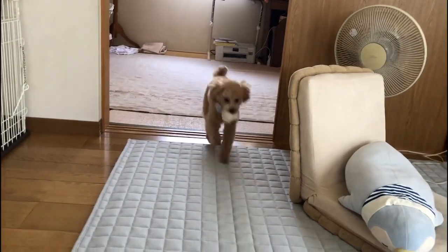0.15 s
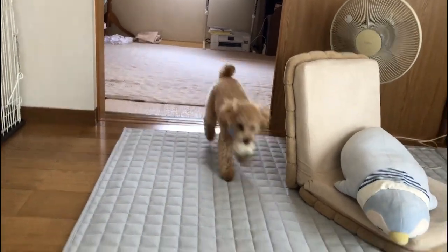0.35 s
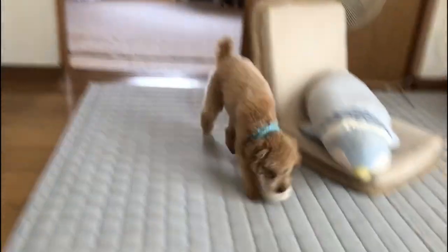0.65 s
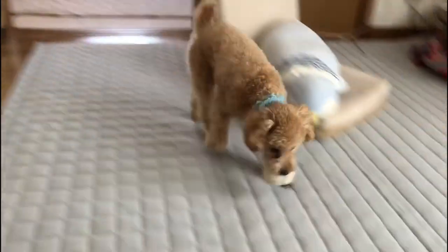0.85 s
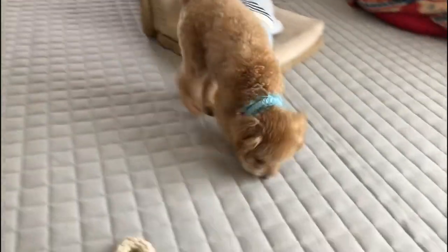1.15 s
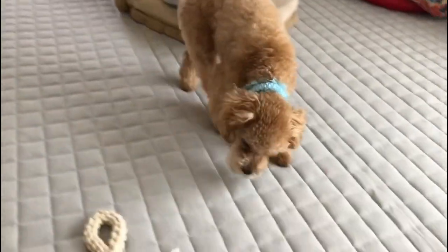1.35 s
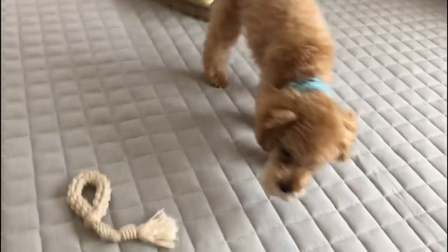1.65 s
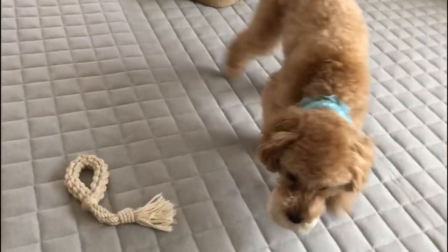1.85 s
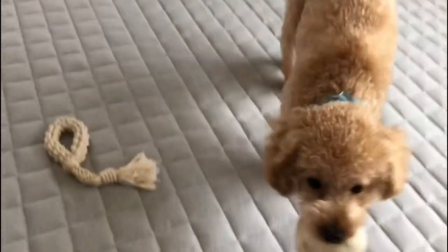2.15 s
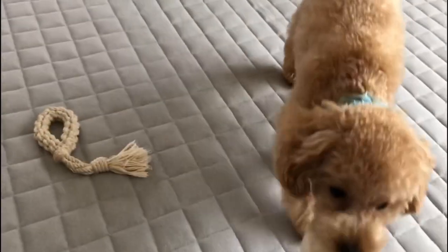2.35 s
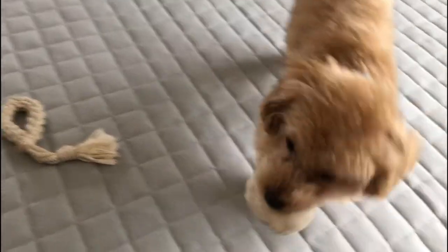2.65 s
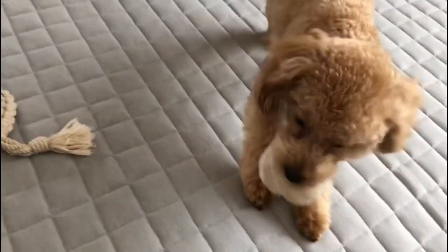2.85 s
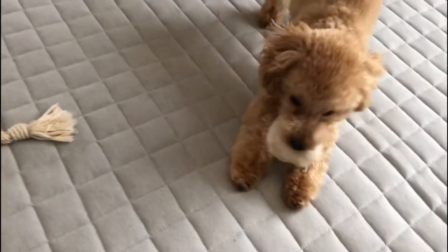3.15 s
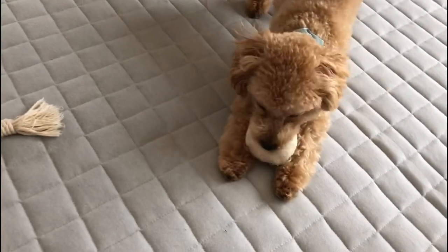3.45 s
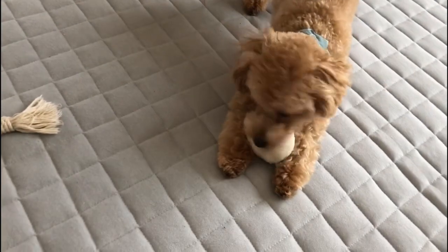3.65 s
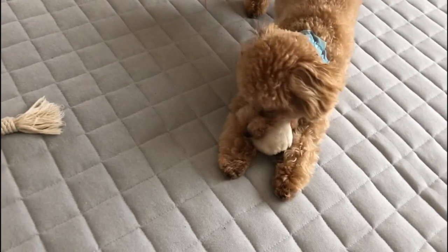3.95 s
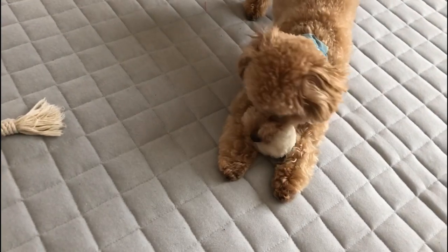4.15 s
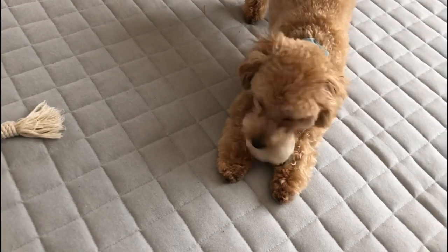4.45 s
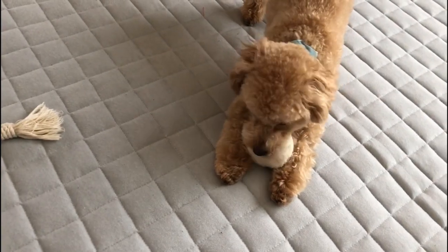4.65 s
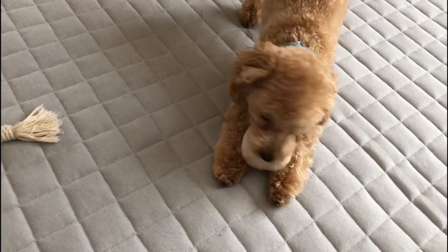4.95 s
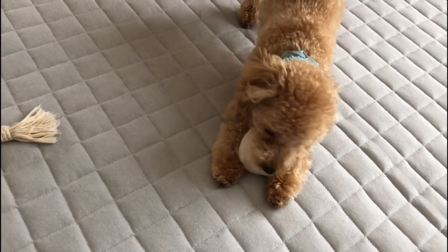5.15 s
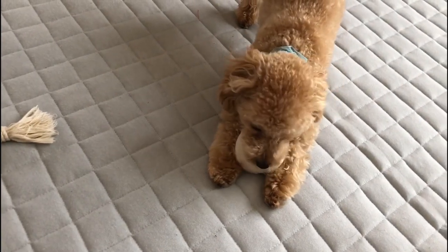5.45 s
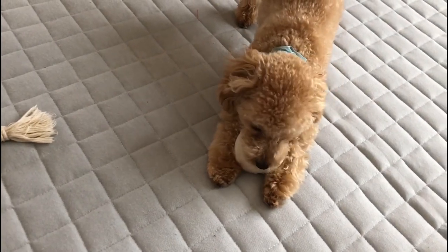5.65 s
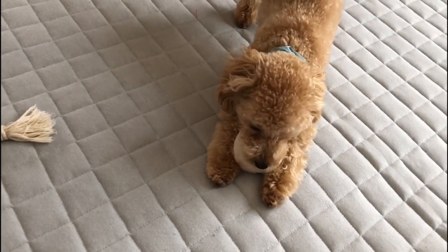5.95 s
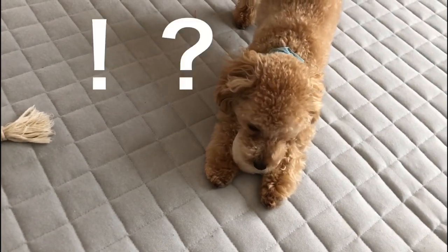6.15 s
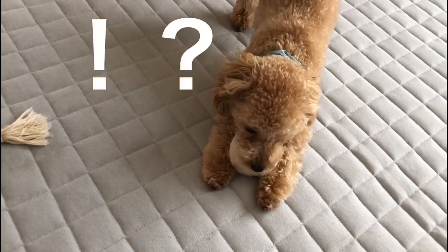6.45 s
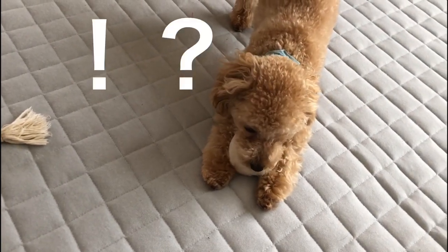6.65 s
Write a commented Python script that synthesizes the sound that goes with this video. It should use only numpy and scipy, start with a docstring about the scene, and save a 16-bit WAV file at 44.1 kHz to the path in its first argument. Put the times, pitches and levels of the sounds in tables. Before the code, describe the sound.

In a small living room, a dog trots in with faint claw ticks and soft, low footfalls. Its plush toy gives one quiet squeak, and paws scuff a mat as it settles near the microphone. It then bites out four short, bright squeaks, each louder than the one before, the last doubled and joined by a dull pop. A fan hums faintly underneath.

```python
"""A small living room: a small dog trots over a quilted mat with a plush toy and lies down close by.
It bites the toy five times. Each bite drives air through the squeaker's reed: a short, bright note whose
pitch arches with the pressure; under the hardest bite the bladder pops. Claws tick on the wooden
threshold, the floor booms softly, the mat is scuffed, and a fan hums faintly over a low room tone."""
import sys
import numpy as np
from scipy import signal
from scipy.fft import rfft, irfft, next_fast_len
from scipy.io import wavfile
from scipy.ndimage import map_coordinates

SR = 44100
rng = np.random.default_rng(int(sys.argv[2]) if len(sys.argv) > 2 else 0)


def put_to_file(sound):
    """Save the sound as 16-bit audio at rate SR, in the file named by the first command-line argument."""
    columns = np.atleast_2d(sound).T  # one column per channel
    safe = np.clip(columns, -1, 1)
    whole_steps = np.round(safe * 32767)
    wavfile.write(sys.argv[1], SR, whole_steps.astype(np.int16))


N = 299457
TIME_S = np.arange(N) / SR
EVENT_S = np.arange(SR // 2) / SR  # time axis of one short event
LEAD_S = 0.006  # the reed stirs before it speaks


def squeaks(start_sag=0.09, end_sag=0.19, room_at_1m_db=-9):
    """Pitch arches with bite pressure; jaw and plush muffle each note differently."""
    # Each row: start in s, length in s, time to crest in s, crest pitch in Hz, hold (1 = even fall,
    # more = late fall), gain in dB, release in s, then low overtones, middle overtones and treble in dB.
    squeezes = [ (0.908, .021, 0.0051, 1365, 3.6, -34, 0.0095, 5.5, -1.5, 1),
                (3.558, 0.031, 0.0064, 1367, 4.3, -26.5, 0.021, -4, -5, -4),
                (4.3299, 0.037, 0.015, 1452, 2.88, -23.5, 0.016, -0.5, -1.5, -4),
                (4.923, .040, 0.018, 1527, 1.06, -22, 0.02, -1.5, -2, -1.4),
                (5.503, 0.01, .0015, 1532, .53, -18, .013, 0.5, 3.5, 10),
                (5.5334, 0.036, 0.014, 1476, 6.4, -22, 0.0088, -5.5, -9.5, 0)]
    # Fundamental, low overtones, middle overtones and treble, in Hz.
    bands_hz = [1400, 2800, 5500, 7500]
    # The dog nears, so the room's share falls. Each row: time in s, distance in m.
    approach = [(0.9, 1.3), (3, 0.63)]
    out = np.zeros(N)
    for start_s, length_s, crest_s, hz, hold, db, release_s, *overtones_db in squeezes:
        muffling = list(zip(bands_hz, [0] + overtones_db))
        pitches_hz = hz * (1 - start_sag), hz, hz * (1 - end_sag)
        note = reed(length_s, crest_s, pitches_hz, hold, release_s, muffling)
        distance_m = np.interp(start_s, *np.transpose(approach))
        room_db = room_at_1m_db + 20 * np.log10(distance_m)
        add(out, start_s - LEAD_S, in_room(amp(db) * note, room_db))
    return out


def reed(length_s, crest_s, pitches_hz, hold, release_s, muffling,
         attack_s=0.00048, jitter=0.0045, flutter=0.013, air_db=-26, leak_db=14, lag_rad=0.45):
    """One note: the reed slaps shut once a cycle and sharpens as the pressure peaks."""
    # Squeaker heard through plush. Each row: frequency in Hz, gain in dB.
    squeaker = [(1400, -1), (2800, -4.5), (4200, -3.5), (5700, -4), (7100, -14), (8500, -11), (10400, -4.5),
                (11800, -9), (13300, -18), (15500, -25)]
    t = np.arange(int((length_s + LEAD_S) * SR)) / SR - LEAD_S
    start_hz, crest_hz, end_hz = pitches_hz
    to_crest = np.clip(1 - t / crest_s, 0, 1)
    spent = np.clip((t - crest_s) / (length_s - crest_s), 0, 1)
    hz = crest_hz + (start_hz - crest_hz) * to_crest ** 2 + (end_hz - crest_hz) * spent ** hold
    failing = spent ** 4  # unsteady and airy as the pressure runs out
    hz *= 1 + (jitter + flutter * failing) * wobble(900, len(t))
    phase = 2 * np.pi * np.cumsum(hz) / SR
    # The swing grows until it saturates; overtones come once the reed slaps.
    growth = 1 / (1 + np.exp(1 - t / attack_s))
    swing = np.sqrt(growth) * np.sin(np.pi / 2 * np.clip((length_s - t) / release_s, 0, 1))
    k = np.arange(1, 14)[:, None]
    gains = amp(along(squeaker, k * hz) + along(muffling, k * hz)) * growth ** (k > 1)
    barrel_lag = lag_rad * k ** 2 / 2  # higher partials come late, smearing each slap
    tone = unit(np.sum(gains * np.cos(k * phase - barrel_lag), axis=0))
    air = noise([(300, -42.5), (900, -10.5)] + squeaker, len(t)) * (1 + 0.48 * np.cos(phase))
    return swing * (tone + amp(air_db + leak_db * failing) * air)


def pops(puff_db=-13, puff_t60_s=0.044, band_hz=(150, 1700)):
    """The bladder buckles and flaps back: each time a damped ring of its wall and a dull puff."""
    # Each row: start in s, gain in dB.
    flaps = [(5.5039, -13), (5.5657, -32.5)]
    # Each row: frequency in Hz, gain in dB, t60 in s.
    wall_modes = [(465, -26, .018), (740, -6.5, 0.0117), (927, -5, 0.012)]
    # Each row: frequency in Hz, level in dB.
    puff_spectrum = [(60, -27), (150, -4.5), (350, -11.5), (600, -12), (950, -3), (1300, 4), (2200, -2),
                     (8000, -36)]
    out = np.zeros(N)
    wall = sum(amp(db) * np.sin(2 * np.pi * hz * EVENT_S) * decay(EVENT_S, t60_s)
               for hz, db, t60_s in wall_modes)
    # The microphone's low cut thins the bass; the treble is dulled.
    pop_band = signal.butter(4, band_hz, "band", fs=SR, output="sos")
    for start_s, db in flaps:
        puff = amp(puff_db) * noise(puff_spectrum, len(EVENT_S)) * decay(EVENT_S, puff_t60_s)
        add(out, start_s, in_room(amp(db) * signal.sosfilt(pop_band, wall + puff), room_db=-10.5))
    return out


def ticks():
    """Claws strike wood, later teeth strike the toy: short noise bursts."""
    # Each row: start in s, level in dB, centre in Hz, t60 in s.
    contacts = [(0.0863, -58, 2510, 0.038), (0.099, -50.5, 1600, 0.023), (.1440, -48.5, 4000, 0.0094),
                (0.219, -48, 3150, 0.019), (0.231, -60, 8000, 0.011), (1.5313, -59.5, 3950, 0.016),
                (4.612, -55.5, 1170, 0.016), (4.873, -61, 5940, 0.02), (5.488, -61.5, 11000, .07)]
    out = np.zeros(N)
    for start_s, db, hz, t60_s in contacts:
        tick = noise([(hz / 4, -18), (hz, 0), (hz * 5, -28)], len(EVENT_S)) * decay(EVENT_S, t60_s)
        add(out, start_s, in_room(amp(db) * tick, room_db=-4))
    return out


def trot(first_s=0.1043, step_s=0.11, steps=5, first_db=-51, fade_db=2.3, floor_hz=81.3):
    """Evenly paced footfalls set the wooden floor booming, each softer than the last."""
    out = np.zeros(N)
    envelope = np.minimum(EVENT_S / 0.011, 1) * decay(EVENT_S, t60_s=0.55)
    for step in range(steps):
        hz = floor_hz * (1 + 0.035 * rng.standard_normal())
        boom = np.sin(2 * np.pi * hz * EVENT_S) * envelope
        add(out, first_s + step * step_s, amp(first_db - step * fade_db) * boom)
    return out


def scuff(grain_db=0.91):
    """Paws and body rub the mat: grainy cloth noise."""
    # Each row: start in s, level in dB, rise in s, t60 in s.
    strokes = [(2.41, -59.5, 0.067, 0.26), (2.489, -51, 0.0015, 0.37)]
    # Each row: frequency in Hz, level in dB.
    cloth_spectrum = [(300, -29), (650, -13), (850, 7.5), (1300, 5), (2200, -6.5), (3600, -14), (5800, -22),
                      (7500, -36), (16000, -43)]
    out = np.zeros(N)
    for start_s, db, rise_s, t60_s in strokes:
        fibres = amp(grain_db * wobble(280, len(EVENT_S))) * noise(cloth_spectrum, len(EVENT_S))
        envelope = np.minimum(EVENT_S / rise_s, 1) * decay(np.maximum(EVENT_S - rise_s, 0), t60_s)
        add(out, start_s, amp(db) * unit(fibres) * envelope)
    return out


def thuds(rise_s=0.0058, t60_s=0.47):
    """The body settles in soft, dull bumps."""
    # Each row: start in s, level in dB, centre in Hz.
    bumps = [(1.41, -63.5, 560), (3.032, -57.5, 280), (4.008, -62, 330), (4.243, -65, 277)]
    out = np.zeros(N)
    envelope = np.minimum(EVENT_S / rise_s, 1) * decay(EVENT_S, t60_s)
    for start_s, db, hz in bumps:
        thud = noise([(hz / 4, -40), (hz, 0), (hz * 2, -22), (hz * 10, -80)], len(EVENT_S))
        add(out, start_s, amp(db) * thud * envelope)
    return out


def slides():
    """Fur hisses over the quilt as the front paws stretch out."""
    # Each row: midpoint in s, level in dB, half length in s.
    strokes = [(2.72, -75, .022), (2.932, -69.5, .04)]
    # Each row: frequency in Hz, level in dB.
    quilt_spectrum = [(1000, -17), (3500, -13), (6000, 2), (11000, -3), (16000, -6)]
    envelope = sum(amp(db) * np.exp(-((TIME_S - mid_s) / half_s) ** 2) for mid_s, db, half_s in strokes)
    return envelope * noise(quilt_spectrum, N)


def fan(motor_hz=55.2, drift=0.002, waver_db=3, air_db=2, tones_db=0.5, ducked_db=-82.5, fade_s=0.064):
    """Steady whir of air and motor tones, ducked by noise suppression between three set stretches."""
    # Each row: start in s, end in s, start gain in dB, end gain in dB, share of low hum.
    heard_stretches = [(-0.1, 3.07, -72, -68, 0), (4.01, 4.27, -71.5, -67, 0.41),
                       (5.21, 6.9, -67.5, -69, 1)]
    # Each row: frequency in Hz, level in dB.
    air_spectrum = [(150, -31.5), (250, -4), (329, 2), (392, -12), (632, -7.5), (883, -6), (963, -6),
                    (1040, -3), (1150, -6.5), (1360, -11.5), (2020, -16), (3210, -20), (8000, -46),
                    (10400, -58), (17600, -120)]
    # Sounding multiples of the motor rate.
    orders = [5, 6, 9, 13, 15, 16, 18, 19, 20, 21, 22, 39]
    # Gain per order in dB, as a whine.
    whine_gains_db = [-7, -9, -28, -9, -22, -11.5, -11, -9, -5.5, -9, -12.5, -14]
    # Gain per order in dB, as a low hum.
    hum_gains_db = [-7, 1, -8.5, -15, -8, -17.5, -24.5, -13.5, -15, -7.5, -16.5, -24.5]
    level, hum_share = np.full(N, amp(ducked_db)), np.zeros(N)
    for start_s, end_s, start_db, end_db, share in heard_stretches:
        gate = np.clip(np.minimum(TIME_S - start_s, end_s - TIME_S) / fade_s + 0.5, 0, 1)
        heard_db = np.interp(TIME_S, [start_s, end_s], [start_db, end_db])
        level += gate * (amp(heard_db) - amp(ducked_db))
        hum_share += gate * share
    tones = np.zeros(N)
    for order, whine_db, hum_db in zip(orders, whine_gains_db, hum_gains_db):
        hz = order * motor_hz * (1 + drift * wobble(14, N))
        db = whine_db + hum_share * (hum_db - whine_db) + waver_db * wobble(7, N)
        tones += np.sqrt(2) * amp(db) * np.sin(2 * np.pi * np.cumsum(hz) / SR)
    return level * (amp(air_db) * noise(air_spectrum, N) + amp(tones_db) * tones)


def room_tone(noise_db=-64.5, drone_db=-72.5, drone_hz=81, swell_db=2):
    """Steady hiss and rumble with a low, fuzzy drone that slowly wavers."""
    # Each row: frequency in Hz, level in dB.
    room_spectrum = [(20, -45.5), (40, -12.5), (60, -5), (125, -6.5), (190, -7.5), (320, -13.5),
                     (600, -18.5), (1100, -23), (2200, -28.5), (5000, -32.5), (10000, -37), (16000, -41)]
    phase = 2 * np.pi * drone_hz * TIME_S
    drone = unit((1.18 + wobble(18, N)) * np.sin(phase) + wobble(24, N) * np.cos(phase))
    return amp(noise_db) * noise(room_spectrum, N) + amp(drone_db + swell_db * wobble(2.7, N)) * drone


def in_room(x, room_db, gap_s=0.0025):
    """Direct sound plus early echoes and a diffuse tail, drawn anew for each event."""
    # Each row: frequency in Hz, t60 in s.
    reverb_times = [(200, 0.45), (1400, 0.38), (3000, 0.34), (6000, 0.32), (11000, 0.23), (16000, 0.21)]
    # Ceiling and walls. Each row: delay in s, gain relative to the tail.
    echoes = [(0.015, 0.48), (0.0315, 0.14), (.042, .12)]
    # Each row: frequency in Hz, reflected gain in dB.
    wall_colour = [(200, 3), (1400, 0), (3500, -4), (5500, -2.5), (7500, -4.5), (11000, -2), (16000, -5.5)]
    hz, t, spectra = signal.stft(rng.standard_normal(len(EVENT_S)), SR, nperseg=256)
    spectra *= decay(t, along(reverb_times, hz)[:, None])
    tail = signal.istft(spectra, SR, nperseg=256)[1][:len(EVENT_S)]
    tail *= np.clip(EVENT_S / gap_s - 1, 0, 1)
    tail /= np.linalg.norm(tail)
    for delay_s, gain in echoes:
        add(tail, delay_s, [gain])
    wet = filtered(signal.fftconvolve(x, tail), lambda hz: amp(along(wall_colour, hz)))
    wet *= amp(room_db) * np.linalg.norm(x) / np.linalg.norm(wet)
    add(wet, 0, x)
    return wet


def amp(db):
    """Decibels to gain."""
    return 10 ** (np.asarray(db) / 20)


def unit(x):
    """Scale to rms 1."""
    return x / np.sqrt(np.mean(x ** 2) + 1e-20)


def along(points, hz):
    """Interpolate (Hz, value) points on a log axis."""
    points_hz, values = np.transpose(points)
    return np.interp(np.log(hz + 1), np.log(points_hz + 1), values)


def wobble(rate_hz, size):
    """Smooth random curve, rate_hz knots a second."""
    knots = rng.standard_normal(int(size * rate_hz / SR) + 4)
    return map_coordinates(knots, [np.arange(size) * rate_hz / SR])


def filtered(x, response):
    """Apply a gain given as a function of Hz."""
    size = next_fast_len(len(x) + 8192)
    return irfft(rfft(x, size) * response(np.fft.rfftfreq(size, 1 / SR)), size)[:len(x)]


def noise(spectrum, size):
    """Noise of rms 1, shaped by (Hz, dB) points."""
    return unit(filtered(rng.standard_normal(size), lambda hz: amp(along(spectrum, hz))))


def decay(t, t60_s):
    """Exponential fall, 60 dB in t60_s."""
    return np.exp(-np.log(1000) * t / t60_s)


def add(track, start_s, x):
    """Mix x into the track in place."""
    part = track[max(round(start_s * SR), 0):][:len(x)]
    part += x[:len(part)]


def scene():
    """Toy, dog and background in mono."""
    toy = squeaks() + pops()
    dog = ticks() + scuff() + thuds() + trot() + slides()
    return (toy + dog + fan() + room_tone())[None]


def record(dry):
    """Steep low-pass."""
    cutoff_hz = 16000
    return np.array([filtered(x, lambda hz: 1 / (1 + (hz / cutoff_hz) ** 120)) for x in dry])


dry = scene()
out = record(dry)
put_to_file(out)
```